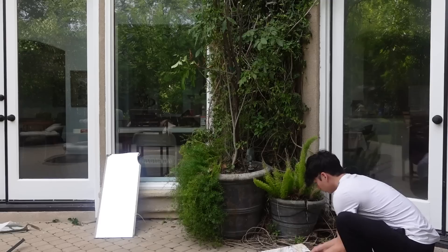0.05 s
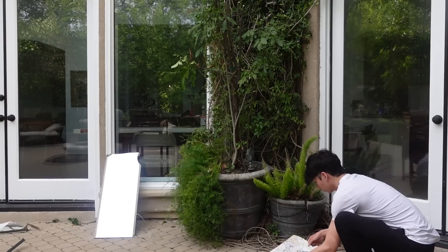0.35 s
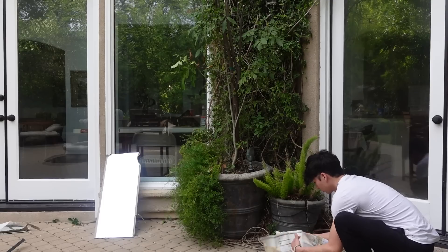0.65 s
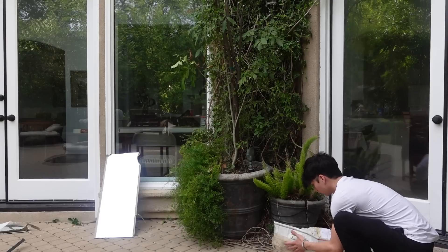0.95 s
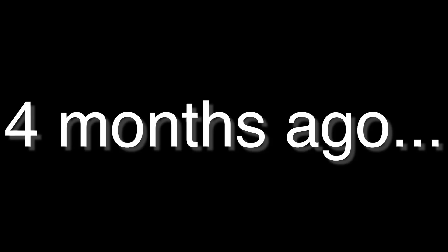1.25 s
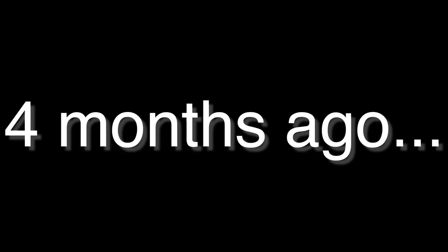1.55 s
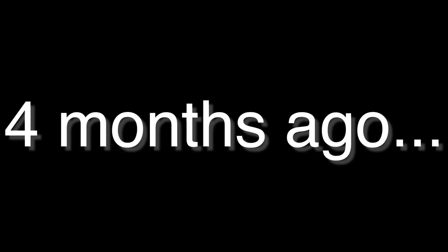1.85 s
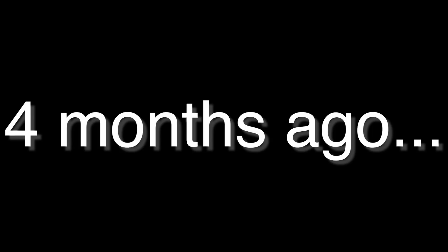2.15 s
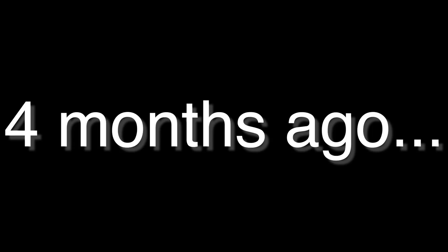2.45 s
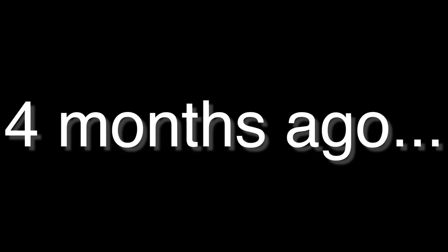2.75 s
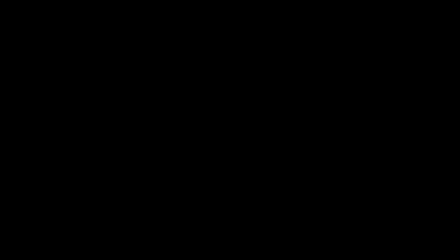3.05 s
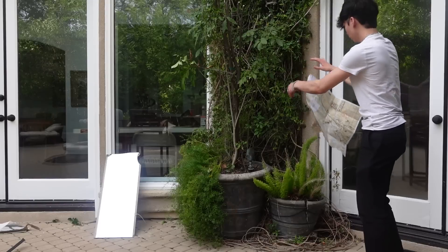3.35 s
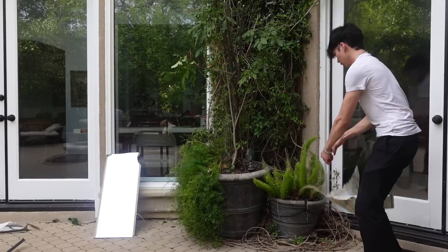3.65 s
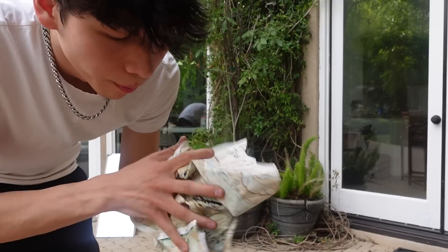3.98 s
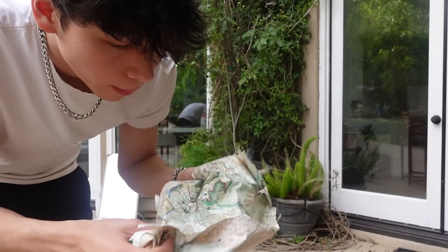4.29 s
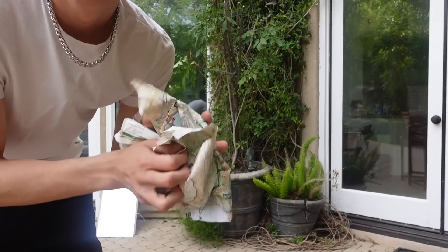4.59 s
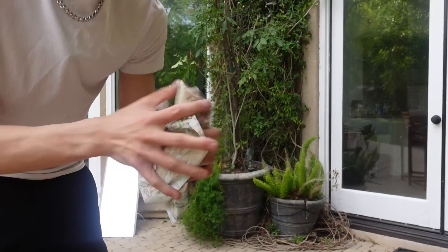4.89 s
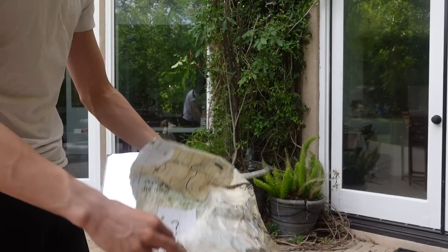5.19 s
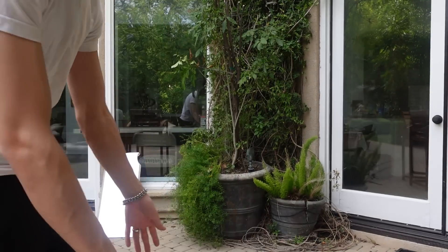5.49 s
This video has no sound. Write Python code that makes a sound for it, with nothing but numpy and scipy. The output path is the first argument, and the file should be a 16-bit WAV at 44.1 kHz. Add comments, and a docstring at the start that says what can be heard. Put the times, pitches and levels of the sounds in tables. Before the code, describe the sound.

A large paper map is handled on a patio over faint outdoor air. At first it is a few steps from the microphone, with a slight, short echo off the house wall. Light crinkles build into sharper crackles and snaps around 0.7 to 1.2 seconds, followed by about five quick, hissing rubs until 1.8 seconds. Softer rustles and ticks thin out to near quiet by 2.5 to 3.2 seconds, then a brief shake crackles at about 3.6 seconds. From 3.9 seconds the paper is suddenly close, dry and much louder, as hands crush it into a wad in rapid squeezes, a dense crunch full of sharp pops. The loudest snap comes just before 5 seconds. One more squeeze and a last small crackle at about 5.3 seconds die away into quiet air.

```python
"""A paper map rustles a few steps away on a patio: lifted, rubbed, shaken out, then crumpled up close.
Its folds buckle in thousands of tiny pops and a few loud snaps, its layers slide with a hiss,
its panels flap. The house wall and glass doors answer briefly, over quiet air and a faint hum."""
import sys
import numpy as np
from scipy import signal
from scipy.fft import rfft, irfft, next_fast_len
from scipy.io import wavfile
from scipy.ndimage import uniform_filter1d, minimum_filter1d, map_coordinates

SR = 44100
rng = np.random.default_rng(int(sys.argv[2]) if len(sys.argv) > 2 else 0)


def transcribe(signal):
    """Save signal, clipped to [-1, 1], as a 16-bit WAV file at the path in sys.argv[1]."""
    frames = np.atleast_2d(signal).T
    limited = np.clip(frames, -1, 1)
    pcm = np.round(limited * 32767).astype(np.int16)
    wavfile.write(sys.argv[1], SR, pcm)


N = 248106
CLOSE_FROM_S = 3.875  # from here on the sheet is at arm's length
# tone of the outdoor air: f/Hz, level/dB
AIR_TONE = [(18, -57.5), (30, -36), (102, -16), (277, -13), (767, -1), (945, 1), (1330, 0.5), (1640, -6.5),
            (1820, -5.5), (3490, -14.5), (4310, -13.5), (15500, -18)]


def open_sheet():
    """The open sheet a few steps away: a dense, even rustle."""
    # tone of the distant folds: f/Hz, level/dB
    tone = [(50, -54), (250, -28), (480, -17), (700, -7.5), (900, -2.5), (1300, 3), (2000, 2.5),
            (3000, 2.5), (5000, -2.5), (7500, -8.5), (10000, -19), (16000, -43)]
    return handling(open_moves(), tone, rate=3000, spread_db=1.0, cycles=1.8, pop_share=0.58,
                    clump_db=1.5, crush_db=-1.5, hiss_db=3.0, flap_db=-1.0, tick_db=-6.0, tick_rate=500)


def crumpled_wad():
    """The wad at arm's length: a spiky crunch."""
    # tone of the close folds: f/Hz, level/dB
    tone = [(50, -72.5), (250, -37.5), (550, -12.5), (800, -5.5), (1050, 0), (1500, -1.5), (2200, -4),
            (3200, -3.5), (5000, -9), (7500, -14.5), (10000, -20.5), (16000, -51)]
    return handling(wad_moves(), tone, rate=2400, spread_db=3.0, cycles=1.22, pop_share=0.56,
                    clump_db=1.7, crush_db=1.4, hiss_db=3.0, flap_db=0, tick_db=-0.5, tick_rate=210)


def handling(moves, tone, rate, spread_db, cycles, pop_share, clump_db,
             crush_db, hiss_db, flap_db, tick_db, tick_rate):
    """Crushing buckles the folds, slides layer on layer and flexes the wide panels."""
    # paper sliding on paper: f/Hz, level/dB
    hiss_tone = [(100, -65.5), (1000, -37), (3500, -1.5), (6000, 2), (8000, 1.5), (11000, -1),
                 (15500, -2.5)]
    # wide panels flapping: f/Hz, level/dB
    panel_tone = [(30, -53.5), (70, -43.5), (120, -22), (180, -15), (270, -2), (480, 5), (620, 7),
                  (900, -3.5), (1600, -49.5)]
    # loose creases relaxing: f/Hz, level/dB
    tick_tone = [(100, -61), (500, -15.5), (750, -3), (1300, 0.5), (2200, -5.5), (4000, -16.5), (9000, -36),
                 (16000, -41)]
    crush, hiss, flap = move_levels(moves)
    # one buckling fold sets off its neighbours, so the pops come in clumps
    clumps = unit(amp(clump_db * (wobble(260) + 0.63 * wobble(60))))
    folds = amp(crush_db) * crinkle(tone, pops(rate, spread_db, cycles), pop_share)
    slide = amp(hiss + hiss_db) * crinkle(hiss_tone, pops(rate, spread_db, cycles), 0.19 * pop_share)
    panels = amp(flap + flap_db) * unit(coloured(rng.standard_normal(N), panel_tone))
    # single hollow ticks stand out when the grip is loose and little slides
    loose = np.clip(-(crush + 22) / 20, 0, 1) * np.clip(-hiss / 12, 0, 1)
    ticks = amp(tick_db) * loose * unit(coloured(pops(tick_rate, spread_db=5.5, cycles=2.2), tick_tone))
    return amp(crush) * clumps * (folds + slide + panels + ticks)


def pops(rate, spread_db, cycles, size=384):
    """Facets buckle at random, rate a second: each rings for a cycle or two at its own pitch."""
    when, pitch, force, sign = rng.random((int(rate * N / SR), 4)).T
    hz = 600 * (16000 / 600) ** pitch
    turns = hz[:, None] * np.arange(size) / SR
    strength = np.sign(sign - .5) * hz * amp(spread_db * np.minimum(-np.log(1 - force), 3))
    rings = strength[:, None] * np.sin(2 * np.pi * turns) * np.exp(-turns / cycles)
    index = (when * N).astype(int)[:, None] + np.arange(size)
    return unit(np.bincount(index.ravel(), rings.ravel(), N)[:N])


def crinkle(tone, grains, pop_share):
    """Pops on a bed of friction noise, in one colour, rms 1."""
    mix = np.sqrt(pop_share) * grains + np.sqrt(1 - pop_share) * rng.standard_normal(N)
    return unit(coloured(hollows(mix, depth_db=1.15), tone))


def hollows(x, depth_db):
    """The folds enclose hollows that keep changing shape, so broad resonances come and go."""
    bands = signal.stft(x, nperseg=256)[2]
    resonances = uniform_filter1d(rng.standard_normal(bands.shape), size=3, axis=0)
    drift = unit(uniform_filter1d(resonances, size=14, axis=1))
    return signal.istft(bands * amp(depth_db * drift), nperseg=256)[1][:N]


def open_moves():
    """Hands flex, rub and slide the open sheet: gains of crush, hiss re crush and flap re crush."""
    # lifts, turns and shakes: t/s, rise/s, hold/s, crush/dB, hiss/dB re crush, flap/dB re crush
    flexes = [(0.0, 0.001, 0.13, -46, -13, -19.5), (0.141, 0.019, 0.058, -43, -13.5, -36),
              (0.291, .003, 0.13, -47, -9.5, -25), (0.462, 0.0045, .02, -41, -7, -32),
              (0.527, 0.0094, 0.012, -41, -19, -20), (0.613, 0.0054, 0.053, -46, -25, -14.5),
              (0.675, 0.0041, 0.083, -37, -15, -11), (0.759, 0.026, 0.046, -32.5, -14.5, -12.5),
              (0.863, 0.023, 0.028, -34.5, -11.5, -14), (0.907, 0.0066, .016, -21, -21.5, -16.5),
              (0.937, 0.0095, 0.014, -28, -15, -8.5), (1.005, 0.021, 0.023, -33, -8.5, -20),
              (1.041, .004, 0.019, -29.5, -10.5, -16), (1.149, 0.0063, .005, -28, -19, -11),
              (1.8, 0.023, .01, -44, -15, -20), (1.949, 0.028, 0.013, -34, -13, -21),
              (2.053, 0.027, .005, -36, -18.5, -29), (2.127, .01, 0.037, -47.5, -11.5, -22),
              (2.203, .005, 0.013, -40.5, -12, -18), (2.257, 0.0073, 0.011, -46.5, -19.5, -17),
              (2.346, .015, 0.026, -58.5, -14.5, -5), (2.46, .015, 0.069, -57.5, -12.5, -17),
              (2.78, 0.007, 0.027, -57, -8.5, -5.5), (2.949, .005, .01, -55, -3, -13),
              (3.217, .006, .008, -54, -2, -22), (3.266, 0.0038, 0.024, -51, -8, -28),
              (3.335, .005, 0.012, -60.5, -1, 0), (3.548, .004, 0.023, -36.5, -12.5, -33),
              (3.573, 0.0082, 0.066, -36, -13.5, -15), (3.714, 0.008, 0.011, -49, -2.5, -27),
              (3.829, .005, 0.056, -47.5, -6, -33)]
    # to-and-fro rubs, about seven a second: middle t/s, crush/dB, hiss/dB re crush
    rubs = [(1.2, -28, -0.5), (1.328, -22.5, -3), (1.464, -24.5, -2), (1.601, -24, -2), (1.743, -27, -6)]
    # the sheet slides over itself with hardly a crease: t/s, rise/s, hold/s, hiss/dB
    slides = [(0.037, .005, 0.057, -49.5), (2.973, 0.021, 0.0066, -51), (3.052, 0.021, 0.16, -61),
              (3.666, .03, 0.27, -58)]
    for start, rise, hold, db, hiss in [(*row[:4], row[4:]) for row in flexes]:
        yield amp(db) * open_stroke(start, rise, hold, fall_s=.03), *amp(hiss)
    for middle, db, hiss in rubs:
        # the hand speeds up and slows down smoothly; the hiss gains on the crush with speed
        speed = np.exp(-((np.arange(N) / SR - middle) / 0.059) ** 2)
        yield amp(db) * speed, amp(hiss) * speed ** 0.43, amp(-18)
    for start, rise, hold, db in slides:
        yield amp(db - 13) * open_stroke(start, rise, hold, fall_s=0.032), amp(13), amp(-9)


def wad_moves():
    """Hands squeeze the wad and let go: gains of crush, hiss re crush and flap re crush."""
    # squeezes: t/s, rise/s, hold/s, fall/s, crush/dB, hiss/dB re crush, flap/dB re crush
    squeezes = [(3.877, 0.0031, 0.078, 0.017, -37.5, -3, -22), (3.932, 0.011, 0.13, 0.022, -32.5, -8, -8),
                (4.001, 0.016, 0.046, 0.044, -24, -9.5, -14), (4.126, 0.037, .1, .02, -23, -12.5, -18),
                (4.262, 0.027, 0.025, 0.036, -21.5, -11, -14.5), (4.377, .02, .02, .02, -29.5, -22, -12.5),
                (4.411, 0.019, 0.019, 0.029, -17, -12, -15),
                (4.532, 0.017, 0.017, 0.024, -30.5, -10.5, -23), (4.57, 0.036, 0.029, 0.038, -20, -12, -25),
                (4.657, 0.027, 0.172, .006, -28, -5.5, -30.5), (4.853, 0.0045, 0.095, .02, -40.5, -18, -20),
                (4.941, 0.0043, 0.018, 0.038, -22.5, -8, -29),
                (5.033, 0.058, 0.07, 0.039, -26.5, -6.5, -21),
                (5.22, .012, 0.0072, 0.003, -30, -9.5, -26.5), (5.262, 0.032, 0.06, 0.086, -52.5, -5, -20)]
    for start, rise, hold, fall, db, hiss, flap in squeezes:
        yield amp(db) * stroke(start, rise, hold, fall), amp(hiss), amp(flap)


def stroke(start, rise_s, hold_s, fall_s):
    """Effort of one move of the hands, 0-1: it builds, holds and dies away."""
    t = np.arange(N) / SR - start
    return np.clip(t / rise_s, 0, 1) * np.exp(-np.maximum(t - rise_s - hold_s, 0) / fall_s)


def open_stroke(start, rise_s, hold_s, fall_s):
    """The open sheet comes to rest after a move; its creases go on relaxing, softly and for longer."""
    settling = amp(-13.5) * stroke(start, rise_s, hold_s, fall_s=0.36)
    return np.maximum(stroke(start, rise_s, hold_s, fall_s), settling)


def move_levels(moves):
    """Overlapping moves add in power: crush dB, then hiss and flap in dB re crush."""
    power = np.full((3, N), 1e-14)
    for crush, hiss, flap in moves:
        power += np.square([crush, crush * hiss, crush * flap])
    crush, hiss, flap = 10 * np.log10(power)
    return crush, hiss - crush, flap - crush


def snaps(cycles, ring_db, crack_db, grit_db, grit_s, flutter_db, size=3072):
    """A fold flips: a sharp crack, a heavily damped ring of its facet, a flutter through the sheet."""
    # folds that snap through: t/s, level/dB, facet f/Hz, crack bite/0.9 dB
    flips = [(0.179, -31.5, 1350, -12), (0.3042, -23, 3830, -2), (0.477, -23, 6977, -15),
             (0.6168, -26.5, 1630, -27), (0.679, -17, 1150, -28), (0.7784, -18, 2200, -12),
             (0.7994, -13, 1195, -17), (0.818, -18.5, 1170, -21), (0.9127, -11, 3160, -9),
             (0.9237, -17.5, 3180, 5), (0.963, -9, 1690, -17), (1.0438, -14.5, 3120, -7),
             (1.0515, -10, 4860, -16), (1.1616, -9, 3596, -6), (1.2928, -13, 4740, -11),
             (1.8318, -28, 1560, -14), (2.0492, -19.5, 2540, -1), (2.076, -19.5, 3630, -22),
             (2.1394, -28, 1660, -3), (2.2108, -28, 2756, -6), (2.29, -27.5, 1480, -26),
             (2.3518, -32, 1390, -19), (2.369, -28, 1320, -22), (2.3996, -33, 1500, -18),
             (2.4447, -31, 1240, -25), (2.8039, -31.5, 1370, -5), (2.9974, -40, 1480, -8),
             (3.276, -32.5, 2980, -16), (3.337, -26, 994, -15), (3.5512, -26, 3670, 4.5),
             (3.5864, -16.5, 1870, -19), (3.6074, -10.5, 2930, -9), (3.832, -31, 2900, -13.5),
             (3.9188, -15.5, 6200, -3), (3.9465, -11.5, 2740, -5), (3.977, -12, 1250, -14),
             (3.9953, -14.5, 4307, 11), (4.016, -6.5, 1580, -13), (4.0335, -6, 3700, -4),
             (4.052, -2.5, 3530, 5), (4.0698, -2, 3340, -5), (4.0908, -13, 2864, -4),
             (4.1313, -4.5, 1550, -1.5), (4.1614, -4, 1070, -20), (4.1815, -3.5, 2010, -7),
             (4.1981, -5.5, 1160, -18), (4.2128, -10, 6100, 3), (4.2226, -10, 1016, -6.5),
             (4.29, -17, 1540, -3), (4.3175, -3, 4300, -20), (4.3444, -12.5, 3208, -12.5),
             (4.406, -5.5, 1270, -20), (4.428, -2, 1065, -12), (4.4486, -11, 1580, -8.5),
             (4.4538, -7, 3015, -3), (4.4592, -9.5, 2520, -3), (4.4899, -5.5, 1890, 2.5),
             (4.532, -9.5, 2060, -10), (4.5766, -12.5, 1280, 2), (4.5914, -8, 2010, -1),
             (4.6022, -3.5, 2320, -19), (4.628, -11.5, 2153, -11), (4.6438, -5, 1485, -18),
             (4.653, -11.5, 1335, -16), (4.6907, -8.5, 1600, -1), (4.719, -9.5, 1800, 0),
             (4.7387, -2.5, 3280, 0.5), (4.758, -10, 1529, -5), (4.769, -5.5, 5200, -3.5),
             (4.7872, -9, 5300, 1), (4.849, -7.5, 2920, -9), (4.8594, -5.5, 1624, -6),
             (4.8951, -17.5, 1529, -23.5), (4.945, -11.5, 2200, 4), (4.9537, 5.5, 1475, -3.5),
             (4.9663, -6.5, 2800, 1), (4.9746, 2.5, 3880, -2), (5.0927, -10.5, 1640, 3),
             (5.1552, -5, 1840, -17), (5.2668, -22, 3870, -9), (5.3049, -9.5, 1500, -35.5),
             (5.3828, -31, 2283, -1.5)]
    rings, cracks = np.zeros((2, N))
    t = np.arange(size) / SR
    for start, db, hz, bite in flips:
        grit, noise = rng.standard_normal((2, size))
        # the facet slackens as it flips, so its pitch sags
        turns = np.cumsum(hz * (0.899 + 0.21 * np.exp(-t * hz / 1.23))) / SR
        ring = (1 - np.exp(-turns / 0.53)) * np.exp(-turns / cycles) * np.sin(2 * np.pi * turns)
        # bending waves run on around the same pitch: long in the open sheet, short in the gripped wad
        flutter_s = 0.0097 if start < CLOSE_FROM_S else 0.003
        waves = unit(signal.lfilter(*signal.iirpeak(min(hz, SR / 3), 2, SR), noise))
        flutter = waves * np.exp(-t / flutter_s)
        add(rings, start, amp(db + ring_db) * ring + amp(db + flutter_db) * flutter)
        # fibres give way for a millisecond or two after the first break
        crack = amp(crack_db) * np.exp(-t / .00004)
        fibres = amp(grit_db) * np.tanh(grit) * np.exp(-(t / grit_s) ** 2)
        add(cracks, start, amp(db + .9 * bite) * (crack + fibres))
    # EQ: f/Hz, level/dB
    ring_eq = [(40, -51), (150, -38), (400, -4), (800, 0)]
    crack_eq = [(40, -63.5), (200, -39), (600, -4), (1500, 4.5), (4000, 5.5), (8000, 1.0), (15000, -7.5)]
    return coloured(rings, ring_eq) + coloured(cracks, crack_eq)


def bumps(push_s, size=2048):
    """Each soft bump of a hand on the sheet is one low push of air."""
    # hand contacts: t/s, level/dB
    contacts = [(0.685, -64), (3.941, -37), (4.161, -45), (4.578, -53.5), (4.954, -55)]
    track = np.zeros(N)
    age = np.arange(size) / SR / push_s
    for start, db in contacts:
        add(track, start, amp(db) * age * (1 - age / 2) * np.exp(1 - age))
    return track


def patio(x):
    """Walls and paving scatter the sound into a short reverb."""
    # reverb time: f/Hz, t60/s
    decay = [(200, 0.27), (1000, 0.37), (4000, 0.31), (14000, 0.57)]
    hz, t, bands = signal.stft(rng.standard_normal(SR // 2), SR, nperseg=256)
    tail = signal.istft(bands * amp(-60 * t / along(decay, hz)[:, None]), SR, nperseg=256)[1]
    tail[:SR // 200] = 0  # 5 ms pre-delay
    return signal.fftconvolve(x, tail / np.linalg.norm(tail))[:N]


def side_scatter(x, decay_s):
    """Sound scattered from the sides reaches left and right slightly differently."""
    # EQ of the side signal: f/Hz, level/dB
    width = [(100, -26.5), (500, -17), (1800, -33), (4000, -22.5), (8000, -20), (15000, -20.5)]
    t = np.arange(SR // 10) / SR
    tail = rng.standard_normal(len(t)) * np.exp(-t / decay_s)
    return coloured(signal.fftconvolve(x, tail / np.linalg.norm(tail))[:N], width)


def air(db):
    """A quiet bed of outdoor air."""
    return amp(db) * unit(coloured(rng.standard_normal(N), AIR_TONE))


def hum():
    """Distant machines hum faintly, each tone fading in and out over 50 ms."""
    # machine tones: start t/s, end t/s, f/Hz, rms level/dB
    tones = [(0, 5.25, 107.5, -94), (5.25, 5.63, 118, -86), (5.25, 6.1, 177, -89.5)]
    t = np.arange(N) / SR
    track = np.zeros(N)
    for start, end, hz, db in tones:
        fade = np.clip(np.minimum(t - start, end - t) * 20, 0, 1)
        track += amp(db) * np.sqrt(2) * np.sin(2 * np.pi * hz * t) * fade
    return track


def amp(db):
    """Decibels to gain."""
    return 10 ** (np.asarray(db) / 20)


def unit(x):
    """Scale to rms 1."""
    return x / np.sqrt(np.mean(x ** 2) + 1e-20)


def along(points, hz):
    """Read (f/Hz, value) points on a log axis."""
    freqs, values = np.transpose(points)
    return np.interp(np.log(hz + 1), np.log(freqs), values)


def coloured(x, tone):
    """Causal EQ through (f/Hz, level/dB) points, so that attacks stay sharp."""
    size = 2 * next_fast_len(N // 2 + SR // 10)
    cepstrum = irfft(np.log(amp(along(tone, np.fft.rfftfreq(size, 1 / SR)))), size)
    cepstrum[1:size // 2] *= 2
    cepstrum[size // 2 + 1:] = 0
    return irfft(rfft(x, size) * np.exp(rfft(cepstrum)), size)[..., :N]


def wobble(rate):
    """A smooth random curve, rate knots a second."""
    return map_coordinates(rng.standard_normal(int(N * rate / SR) + 4), [np.arange(N) * rate / SR])


def add(track, start, sound):
    """Mix a sound into a track at start seconds."""
    place = track[max(round(start * SR), 0):][:len(sound)]
    place += sound[:len(place)]


def scene():
    """The far sheet is wet, the near wad dry; reflections and air give the width."""
    paper = open_sheet() + crumpled_wad()
    paper += snaps(cycles=1.4, ring_db=2.0, crack_db=-3, grit_db=-2.0, grit_s=0.0011, flutter_db=-15)
    paper += bumps(push_s=0.00087)
    close = np.arange(N) / SR > CLOSE_FROM_S
    to_walls = paper * np.where(close, amp(-16.5), amp(-9.5))
    mid = paper + patio(to_walls) + air(db=-63.5 + .6 * wobble(4)) + hum()
    to_sides = paper * np.where(close, 1, amp(4.5))
    side = side_scatter(to_sides, decay_s=0.014) + air(db=-67.0) + amp(-9) * patio(to_walls)
    return np.array([mid + side, mid - side])


def record(dry):
    """A limiter briefly ducks the tallest peaks, then a steep low-pass cuts the extreme top."""
    ceiling, top_hz = .9, 15900
    size = next_fast_len(N + SR // 10)
    needed = np.minimum(1, ceiling / (np.abs(dry).max(axis=0) + 1e-9))
    gain = uniform_filter1d(minimum_filter1d(needed, size=129), size=129)
    passband = np.fft.rfftfreq(size, 1 / SR) < top_hz
    return irfft(rfft(dry * gain, size) * passband, size)[..., :N]


dry = scene()
out = record(dry)
transcribe(out)
```